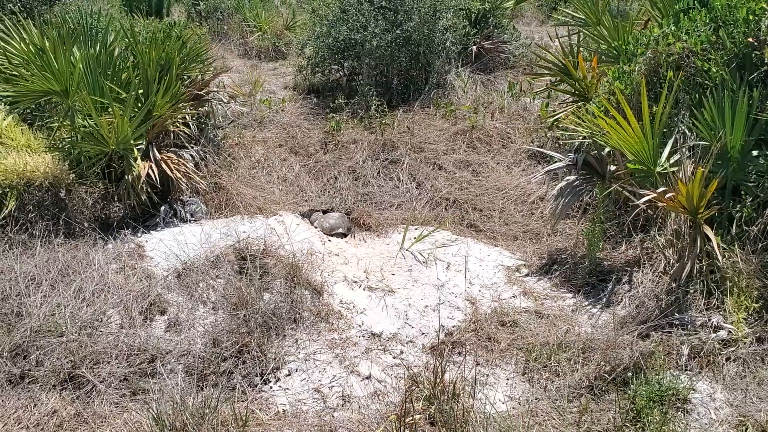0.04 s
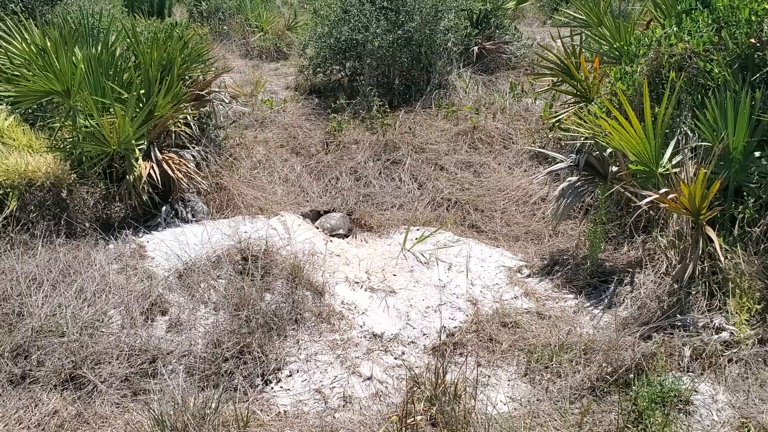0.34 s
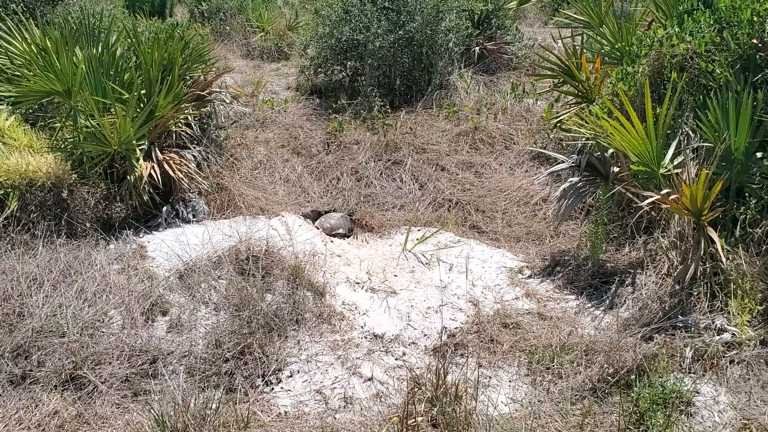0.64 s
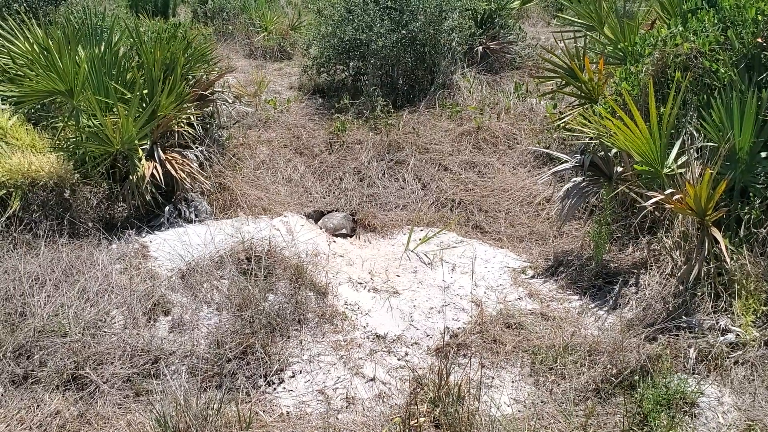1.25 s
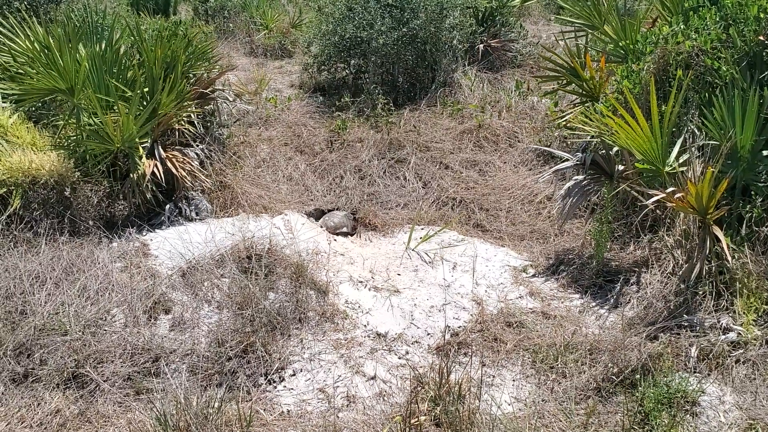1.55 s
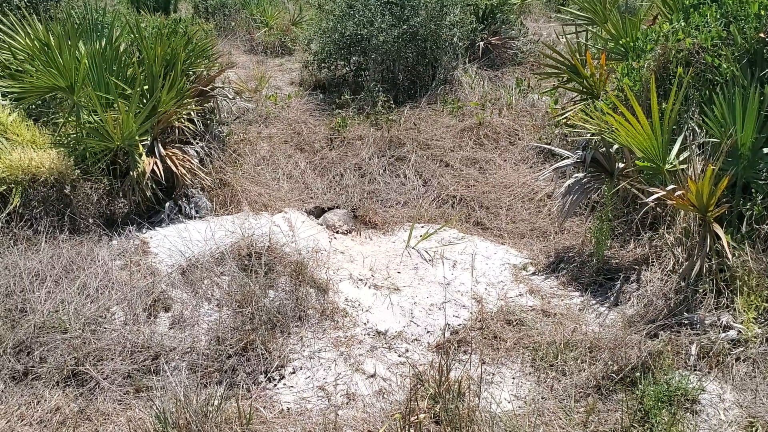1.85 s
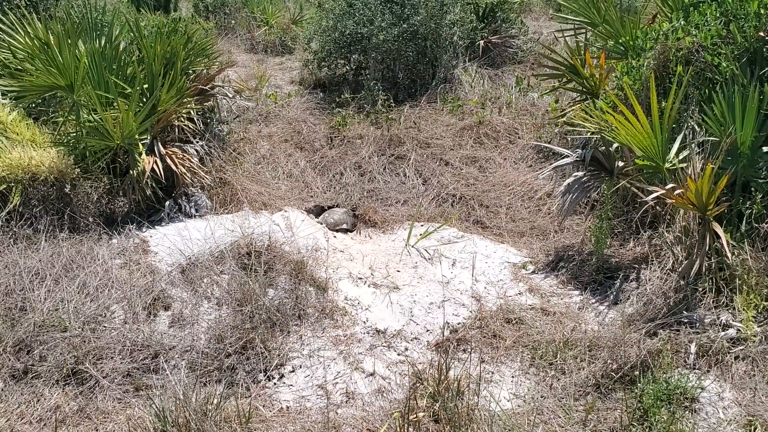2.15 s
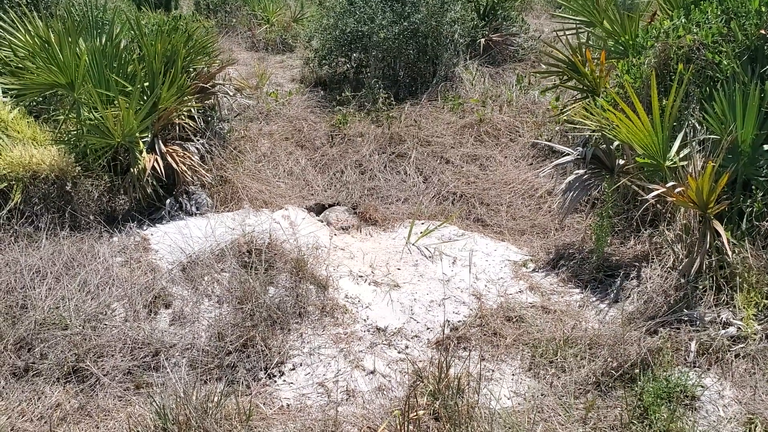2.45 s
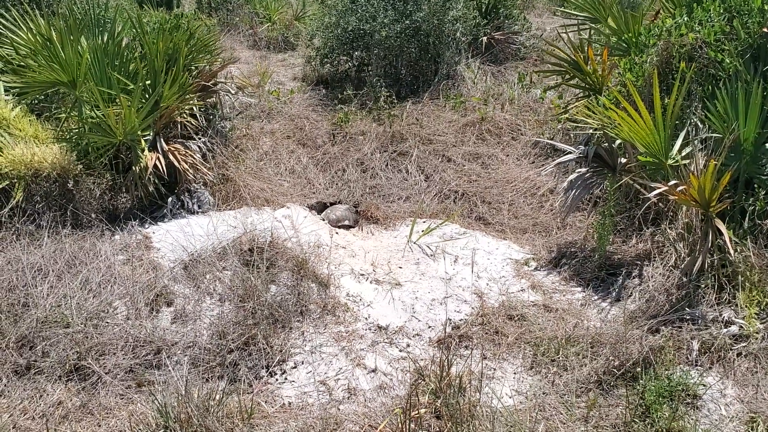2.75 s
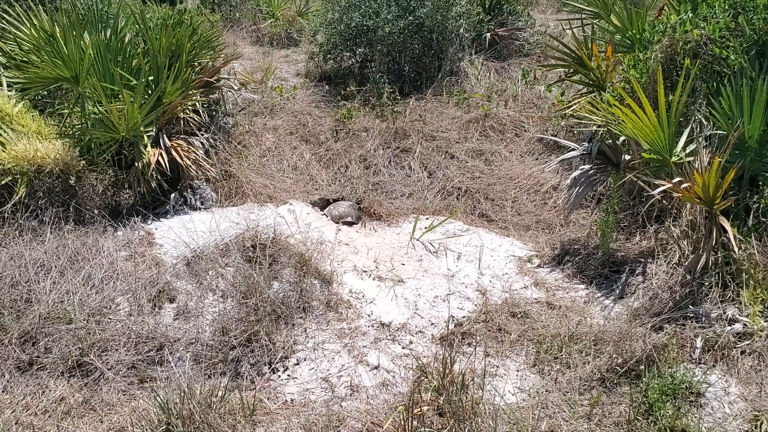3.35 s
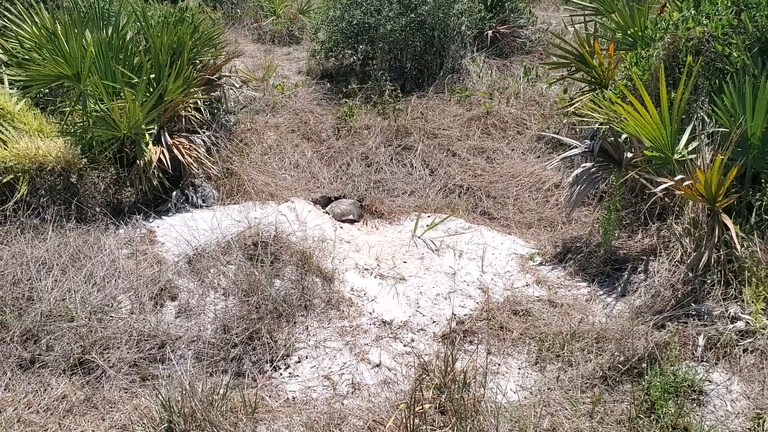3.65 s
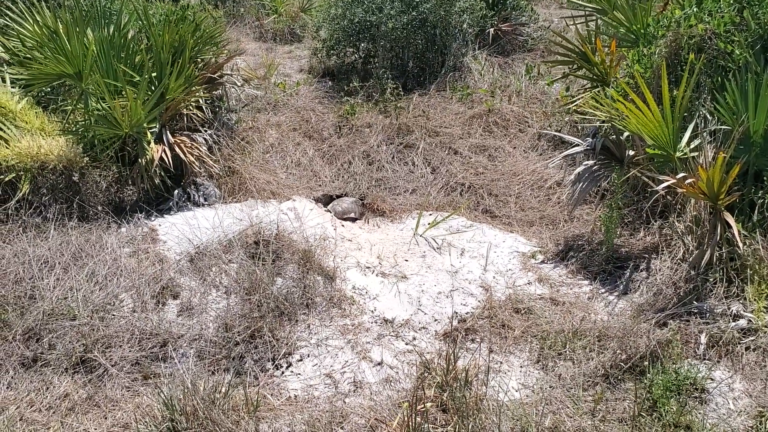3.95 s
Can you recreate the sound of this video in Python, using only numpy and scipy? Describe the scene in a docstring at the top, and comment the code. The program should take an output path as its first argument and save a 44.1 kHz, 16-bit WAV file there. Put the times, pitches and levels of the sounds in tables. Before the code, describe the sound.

Wind buffets the microphone with a low rumble, light at first and strongest in the last second, mostly on the left. Behind it, in dry open scrubland, insects buzz thinly on the right and birds give faint whistles and chips.

```python
"""Dry open scrubland on a hot day. A distant wash and faint insects sound throughout, and at first only
light gusts buffet the left microphone port. Birds give thin slurred whistles and a few sharp chips; one
buzzing insect stops abruptly at 1.1 s and creeps back. After 2 s dry fronds rustle and a katydid swells
on the right, its scraped wings ringing near 7 kHz. From 2.5 s the gusts reach the right port too, and in
the last second their turbulence rumbles hardest, mostly on the left."""
import sys
import numpy as np
from scipy import signal
from scipy.fft import rfft, irfft
from scipy.io import wavfile
from scipy.ndimage import uniform_filter1d

SR = 44100
rng = np.random.default_rng(int(sys.argv[2]) if len(sys.argv) > 2 else 0)


def store_pcm(level_fs):
    """Save levels as 16-bit WAV."""
    pcm = np.round(np.clip(level_fs, -1, 1) * 32767).astype(np.int16)
    wavfile.write(sys.argv[1], SR, np.atleast_2d(pcm).T)


N = 176400
TIME_S, BIN_HZ = np.arange(N) / SR, np.fft.rfftfreq(N, 1 / SR)


def amp(db):
    """Decibels as an amplitude ratio."""
    return 10 ** (np.asarray(db) / 20)


def unit(x):
    """Normalisation to unit RMS."""
    return x / np.sqrt(np.mean(x ** 2) + 1e-30)


def curve(points):
    """Linear interpolation over time."""
    return np.interp(TIME_S, *np.transpose(points))


def spectrum(points):
    """Interpolation over log frequency."""
    hz, value = np.transpose(points)
    return np.interp(np.log(BIN_HZ + 1), np.log(hz), value)


def shaped(x, gain):
    """Spectral filtering, returned at unit RMS."""
    return unit(irfft(rfft(x) * gain, N))


def drift(hz):
    """Random modulation: noise low-passed at the given rate."""
    return shaped(rng.standard_normal(N), 1 / (1 + (BIN_HZ / hz) ** 4))


def swell(peak_s, sigma_s, db):
    """A Gaussian envelope."""
    return amp(db) * np.exp(-.5 * ((TIME_S - peak_s) / sigma_s) ** 2)


def panned(x, left_db):
    """Direction by level difference; negative is to the right."""
    return x * amp([[left_db / 2], [-left_db / 2]])


def add(mix, start_s, sound):
    """Superposition of a sound from its start time."""
    part = mix[max(round(start_s * SR), 0):][:len(sound)]
    part += sound[:len(part)]


# Spectrum of the wash: frequency_hz, relative_db
WASH_SPECTRUM = [(20, -8), (60, 0.7), (260, -13), (420, -21), (720, -17), (1100, -26), (1700, -33),
                 (2600, -33), (3800, -42.5), (4800, -38), (8500, -47), (13000, -43), (15700, -47)]
# Likeness of left and right: frequency_hz, correlation
WASH_CORRELATION = [(100, 0.94), (14000, 0.031)]
# Slight swell of the wash: time_s, level_db
WASH_ENVELOPE = [(0, -58.5), (2.1, -55), (4, -57)]


def wash():
    """Partial coherence: distant air and foliage, alike at both ports in the bass, unlike in the treble."""
    left, independent = rfft(rng.standard_normal((2, N)))
    correlation = np.clip(spectrum(WASH_CORRELATION), -1, 1)
    right = correlation * left + np.sqrt(1 - correlation ** 2) * independent
    pair = irfft(np.array([left, right]) * amp(spectrum(WASH_SPECTRUM)), N)
    return unit(pair) * amp(curve(WASH_ENVELOPE))


# Insect trills near 5 kHz, a faint bird chorus near 2.3 kHz:
# pitch_hz, bandwidth_hz, peak_s, sigma_s, level_db
FAR_VOICES = [(4954, 52, 0.73, 1, -82), (5270, 20, 1.29, 0.27, -77), (2320, 190, 1.56, 0.32, -73.5)]


def far_voices(pulse_hz=131.4, wander=.003):
    """Amplitude modulation: narrow noise bands swell and fade as far insect trills and a bird chorus."""
    out = 0
    pulses = 1 + np.cos(2 * np.pi * np.cumsum(pulse_hz * (1 + wander * drift(8.5))) / SR)
    for hz, bandwidth_hz, *envelope in FAR_VOICES:
        resonance = 1 / (1 + ((BIN_HZ - hz) / bandwidth_hz * 2) ** 2)
        tone = shaped(rng.standard_normal((2, N)), resonance)
        out += unit(tone * pulses) * swell(*envelope)
    return out


# Fronds above 10 kHz, the katydid's wing peak near 4.6 kHz:
# peak_s, sigma_s, level_db, centre_hz, sigma_octaves
HISS_BANDS = [(0.213, 0.074, -69, 14900, 0.76), (2.143, 0.23, -76.5, 4650, 0.14),
              (2.25, 0.19, -75.5, 11500, 0.61), (2.974, .091, -69.5, 10300, 0.17)]


def hisses(grain_db=1.5):
    """Modulated band noise: dry fronds rustle, and a narrow hiss swells with the katydid's buzz."""
    out = 0
    for *envelope, hz, octaves in HISS_BANDS:
        grains = rng.standard_normal((2, N)) * amp(grain_db * drift(90))
        band = np.exp(-.5 * (np.log2((BIN_HZ + 1) / hz) / octaves) ** 2)
        out += swell(*envelope) * shaped(grains, band)
    return out


def whistle(length_s, top_hz, db, fall, peak_at=.1, quaver=.028):
    """Frequency modulation: a quavering tone slides down by the fraction `fall` and levels out."""
    progress = np.arange(0, 1, 1 / (length_s * SR))
    n = len(progress)
    slide = np.sin(np.pi / 2 * (progress - peak_at) / (1 - peak_at)) ** 2
    hz = top_hz * (1 - fall * slide) * (1 + quaver * drift(250)[:n])
    envelope = amp(db + 2 * drift(90)[:n]) * np.sin(np.pi * progress)
    return envelope * np.sqrt(2) * np.sin(2 * np.pi * np.cumsum(hz) / SR)


def chip(length_s, top_hz, db, octave_db, low_db, arch=.27, peak_at=.33, flutter=.055):
    """Biphonation: a rough, arching note and its octave sound over a raspy lower voice."""
    low_ratio, rasp_hz, rough_db = .72, 450, 4
    progress = np.arange(0, 1, 1 / (length_s * SR))
    n = len(progress)
    hz = top_hz * (1 - arch * (progress - peak_at) ** 2) * (1 + flutter * drift(510)[:n])
    phase = 2 * np.pi * np.cumsum(hz) / SR
    rasp = drift(rasp_hz)[:n] * np.sin(low_ratio * phase)
    voice = np.sin(phase) + amp(octave_db) * np.sin(2 * phase) + amp(low_db) * rasp
    envelope = amp(db + rough_db * drift(rasp_hz)[:n]) * np.sin(np.pi * progress) ** .48
    return envelope * voice


# Falling whistles: start_s, length_s, top_hz, level_db
BIRD_SLURS = [(.68, 0.16, 3100, -82.5), (.82, .2, 3464, -78.5), (1.485, 0.17, 3370, -73.5),
              (1.915, 0.1, 3160, -70.5), (2.13, .17, 3123, -73), (2.568, .054, 3820, -74),
              (2.645, .05, 2840, -73.5), (2.85, .19, 3424, -82.5), (3.68, 0.04, 3390, -75.5)]
# Level notes: start_s, length_s, pitch_hz, level_db
BIRD_PIPS = [(.315, 0.075, 3410, -73)]
# Sharp chips: start_s, length_s, top_hz, level_db, octave_relative_db, low_voice_relative_db
BIRD_CHIPS = [(0.58, 0.032, 3330, -52, -6.5, -15), (1.717, 0.052, 3410, -67, -7, 0),
              (2.997, 0.04, 3090, -64, -32.5, 1.5)]


def birds(echo_db=-1, t60_s=.45):
    """Reverberation: the bushes give the calls a short echo; the nearer chips are drier."""
    far, near = np.zeros((2, N))
    for notes, fall in (BIRD_SLURS, .3), (BIRD_PIPS, 0):
        for start_s, *note in notes:
            add(far, start_s, whistle(*note, fall))
    for start_s, *note in BIRD_CHIPS:
        add(near, start_s, chip(*note))
    t = TIME_S[:SR // 2]
    tail = rng.standard_normal((2, len(t))) * amp(-60 * t / t60_s)
    tail /= np.linalg.norm(tail[0])
    echo = signal.fftconvolve((far + .41 * near)[None], tail, axes=1)[:, :N]
    return far + panned(near, left_db=-6) + amp(echo_db) * echo


def patchy(x, depth_db=3):
    """Time-varying filtering: the tone colour shifts in slow random patches."""
    frames = signal.stft(x, nperseg=1024)[2]
    patches = uniform_filter1d(rng.standard_normal(frames.shape[1:]), size=9, axis=0)  # over frequency
    patches = uniform_filter1d(patches, size=30, axis=1)  # over time
    return signal.istft(frames * amp(depth_db * unit(patches)))[1][:, :N]


def stridulate(envelope, wing, left_db, stroke_hz=86.9, tooth_hz=348.2, scatter_db=-4.5):
    """Stridulation: each stroke's uneven tooth impacts ring the wing; the brush scatters some sound."""
    duty, wander = .89, .003
    phase = np.cumsum(stroke_hz * (1 + wander * drift(2.7))) / SR % 1
    stroke = np.sin(np.pi * np.minimum(phase / duty, 1)).clip(0) ** .5
    tooth = np.floor(phase / stroke_hz * tooth_hz + .5 + .18 * drift(150))
    impacts = np.diff(tooth, prepend=0) > 0
    resonances = amp(spectrum(wing))
    direct = shaped(impacts * stroke, resonances)
    ports = np.array([np.roll(direct, 14), direct])  # reaches the left port 14 samples later
    scatter = shaped(rng.standard_normal((2, N)) * (stroke + .5), resonances)
    buzz = panned(ports, left_db) + amp(scatter_db) * panned(scatter, left_db / 2)
    return buzz * amp(curve(envelope))


# Song of the near katydid: time_s, level_db
KATYDID_ENVELOPE = [(0, -71.5), (.75, -75.5), (.93, -68), (1.13, -78.5), (1.4, -69.5), (1.75, -73),
                    (2.2, -59), (2.55, -70), (2.93, -60.5), (3.4, -66), (3.6, -73.5), (4, -80.5)]
# Its wing resonances: frequency_hz, relative_db
KATYDID_SPECTRUM = [(3750, -44), (4500, -13.5), (5550, -24.5), (6600, -5), (7030, 5.5), (7500, -14.5),
                    (8000, -20.5), (9450, -21), (10400, -28), (12000, -18.5), (15700, -30)]
# A fainter insect that stops abruptly and creeps back: time_s, level_db
BUZZER_ENVELOPE = [(.05, -79.5), (1.07, -73), (1.085, -100), (2.3, -71), (2.5, -79)]
# Its wing resonances: frequency_hz, relative_db
BUZZER_SPECTRUM = [(5500, -32), (6500, -10), (7450, 6), (7950, -10), (15700, -29.5)]


def insects():
    """Wing resonance gives each of two insects on the right its own buzz."""
    katydid = stridulate(KATYDID_ENVELOPE, KATYDID_SPECTRUM, left_db=-9)
    return katydid + stridulate(BUZZER_ENVELOPE, BUZZER_SPECTRUM, left_db=-17)


# Gusts at the left port: time_s, strength_db
LEFT_GUSTS = [(0, -49.5), (.37, -37.5), (.5, -64), (.88, -59), (.98, -41), (1.24, -32.5), (1.72, -55),
              (1.86, -30.5), (2.07, -28), (2.26, -34.5), (2.45, -45), (2.58, -27.5), (2.82, -57.5),
              (2.94, -18), (3.12, -26.5), (3.18, -38), (3.39, -19.5), (3.5, -29), (3.68, -24.5), (3.8, -35),
              (3.95, -31), (4, -87)]
# Gusts at the right port: time_s, strength_db
RIGHT_GUSTS = [(2.48, -60), (2.54, -31.5), (2.77, -57), (2.87, -34), (3.06, -28), (3.2, -42), (3.36, -33.5),
               (3.68, -48), (3.85, -29), (4, -46)]
# Single eddies striking the left port: peak_s, sigma_s, strength_db
LEFT_BUFFETS = [(0.074, 0.0098, -29.5), (0.122, 0.0077, -29), (0.238, 0.0086, -28), (2.001, 0.0036, -12.5),
                (2.602, 0.0075, -22), (2.682, 0.015, -24), (3.123, 0.0091, -18.5), (3.24, 0.0038, -9),
                (3.292, .009, -16), (3.363, 0.0079, -11.5), (3.437, 0.036, -12), (3.532, 0.0086, -10.5),
                (3.74, 0.012, -7.5)]
# Turbulence spectrum at the reference strength: frequency_hz, relative_db
RUMBLE_SPECTRUM = [(25, -13), (55, 0.5), (90, 1.5), (150, -8.5), (260, -18), (400, -31.5), (650, -50.5),
                   (1500, -89.5)]


def wind(gusts, buffets=(), lump_db=5, lump_hz=21.4, port_cutoff_hz=42.6):
    """Turbulent pressure at one port: the harder the wind blows, the higher its rumble reaches."""
    reference_db, knee_hz, brighten = -16, 64, .49  # brighten: dB per octave per dB of strength
    strength = amp(curve(gusts) + lump_db * drift(lump_hz))
    for buffet in buffets:
        strength = np.hypot(strength, swell(*buffet))
    rumble = shaped(rng.standard_normal(N), amp(spectrum(RUMBLE_SPECTRUM)))
    power = uniform_filter1d(abs(signal.hilbert(rumble)) ** 2, size=900)
    eddies = rfft(unit(rumble / np.sqrt(power)))  # evened out, so the strength shapes the level
    octaves = np.log2(np.maximum(BIN_HZ / knee_hz, 1))
    pressure = 0
    for octave in range(6):
        band = irfft(eddies * np.maximum(1 - abs(octaves - octave), 0), N)
        tilt = (strength / amp(reference_db)) ** (brighten * (min(octave, 3) - .5))
        pressure += band * strength * tilt
    return signal.lfilter(*signal.butter(2, port_cutoff_hz, "highpass", fs=SR), pressure)


def scene():
    """Superposition of all sources at the left and right ports."""
    gusts = np.array([wind(LEFT_GUSTS, LEFT_BUFFETS), wind(RIGHT_GUSTS)])
    buzz = insects()
    return wash() + patchy(buzz + hisses()) + far_voices() + birds() + gusts


def record(dry, cutoff_hz=15740):
    """Band limiting: a steep low-pass removes the highest treble."""
    lowpass = signal.firwin(1023, cutoff_hz, window=("kaiser", 9), fs=SR)
    return signal.oaconvolve(dry, lowpass[None], "same")


dry = scene()
out = record(dry)
store_pcm(out)
```